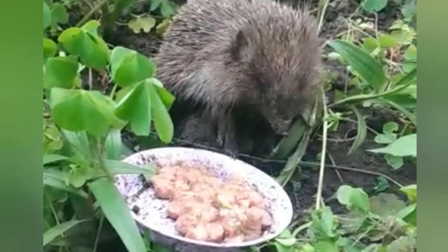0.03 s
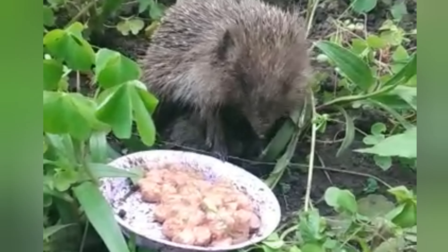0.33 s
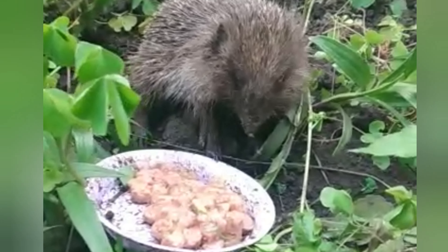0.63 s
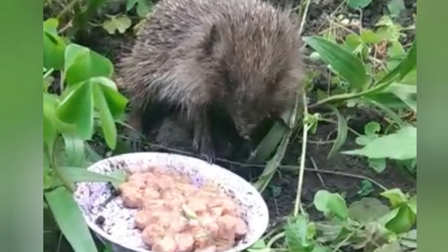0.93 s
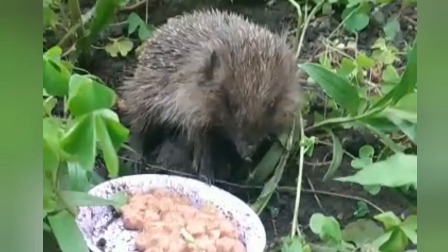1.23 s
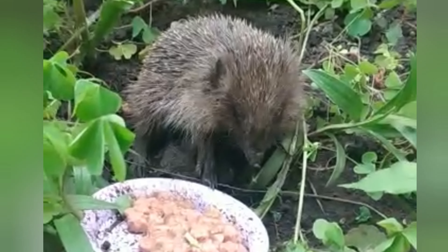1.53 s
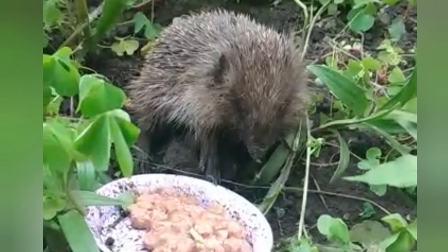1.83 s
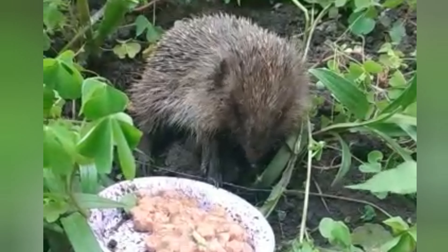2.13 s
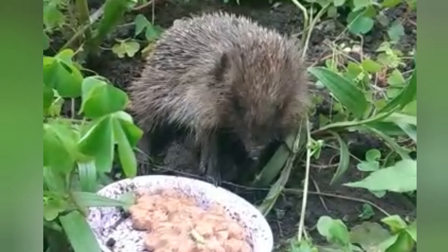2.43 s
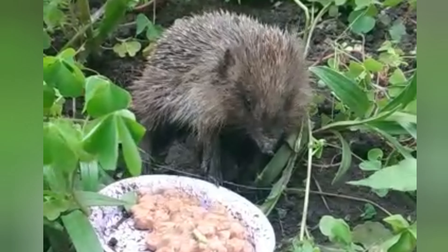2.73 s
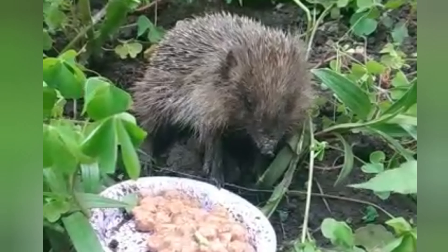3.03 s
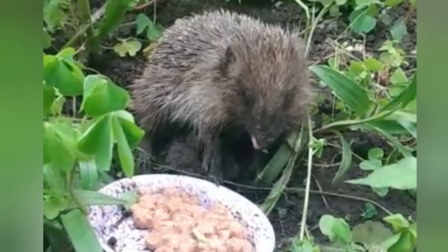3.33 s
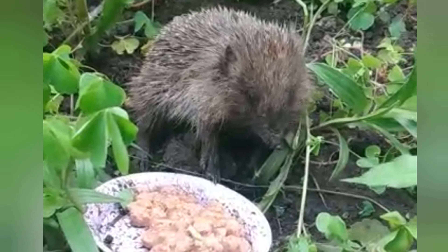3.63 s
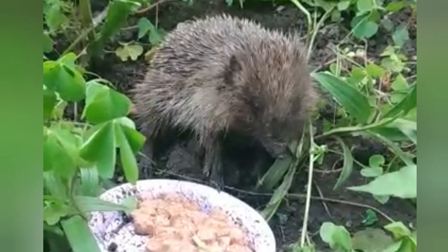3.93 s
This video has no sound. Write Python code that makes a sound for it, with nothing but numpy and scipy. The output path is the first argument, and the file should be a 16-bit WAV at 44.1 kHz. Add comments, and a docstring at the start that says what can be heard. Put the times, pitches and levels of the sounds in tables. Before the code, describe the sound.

A low, dull outdoor hum continues throughout, with light wind rumble on the microphone. From 0.25 to 0.55 seconds, handling knocks bump on the left, with one sharp click at 0.4. Soft wind puffs come on the right between 1.3 and 2.3 seconds. Leaves rustle faintly near 1.8 and 3.2 seconds, with a tiny dry crackle at 2.7 and a faint stem tick at 3.6.

```python
"""A quiet garden, where a hedgehog stands among plants by a dish of food.
A dull distant hum lies under light air rumbling on the two microphone ports.
Leaves stir faintly in swells of noise, stems tick and something dry crackles.
The hand-held recorder is knocked a few times near its left port: damped casing modes thud, ring, click."""
import sys
import numpy as np
from scipy import signal
from scipy.io import wavfile

SR = 44100
rng = np.random.default_rng(int(sys.argv[2]) if len(sys.argv) > 2 else 0)


def log_audio(samples):
    """Write samples as a 16-bit WAV file to the path given in sys.argv[1]."""
    # one column per channel
    frames = np.atleast_2d(samples).T
    # limit to full scale, then quantise
    limited = np.clip(frames, -1, 1)
    pcm = np.round(limited * 32767).astype(np.int16)
    wavfile.write(sys.argv[1], SR, pcm)


N = 176400

# Distant hum. Each row: frequency in Hz, relative spectral density in dB.
HUM_SPECTRUM = [(30,17.5),(50,14.5),(72,14),(95,6.5),(160,8.5),(250,-0.5),(390,0),(520,-6),(700,-5.5),(880,-6),(1200,-10),(1800,-13.5),(2300,-22.5),(2800,-31)]
# Each row: frequency in Hz, left-right correlation.
HUM_CORRELATION = [(60,1),(180,1),(300,.82),(520,.5),(890,.24),(1520,-0.2),(2600,-0.012)]
# Each row: frequency in Hz, left minus right in dB.
HUM_BALANCE = [(60,-1.5),(210,4),(490,4),(740,1),(1700,2.5),(2600,6)]
# Narrow bands in the hum. Each row: centre in Hz, width in Hz, level in dB.
DRONES = [(72.4,17,-58),(129,52,-62.5),(312.3,117,-65.5),(827,270,-80)]
# Air on each port. Each row: time in seconds, level in dB.
AIR_LEFT = [(0,-51.5),(1.2,-55.5),(1.55,-65.5),(2.0,-55),(2.5,-56.5),(3.3,-59.5),(4,-48)]
AIR_RIGHT = [(0,-42.5),(.33,-62.5),(.6,-58.5),(1.2,-58),(1.3,-48),(1.48,-49.5),(1.57,-44.5),(1.65,-39.5),(1.71,-54),(1.76,-47),(1.81,-40.5),(1.9,-42),(1.97,-36),(2.04,-46),(2.22,-46.5),(2.26,-32),(2.32,-47),(2.552,-54),(2.78,-47.5),(2.95,-59.5),(3.28,-59),(3.42,-45.5),(3.6,-75),(3.86,-39.5),(4,-66)]
# Gusts. Each row: peak time and length in seconds, centre and width in Hz, left and right level in dB.
GUSTS = [(1.3,0.024,73.6,69.5,-52,-43.5),(1.888,0.2,79,49.8,-55,-42.5),(2.261,0.018,110,130,-59,-40.5)]
# Leaf contacts. Each row: peak time in seconds, length in seconds, level in dB.
LEAF_BRUSHES = [(1.05,.16,-97),(1.578,.07,-97),(1.76,.14,-96),(2.2,.05,-96),(2.462,.06,-93),(3.9,.025,-90.5)]
# Leaf hiss. Each row: centre in Hz, width in Hz, gain in dB.
LEAF_BANDS = [(2730,870,-1),(6300,2000,-3.5)]
# Rasp, rustle, far whine. Each row: peak time and length in seconds, centre and width in Hz, level in dB.
RUSTLES = [(1.764,0.05,1420,446,-61),(1.782,0.097,1907,170,-66.5),(1.77,0.13,2200,1200,-76),(2.61,0.32,2310,698,-75.5),(2.727,0.024,1910,1000,-75),(3.141,0.066,1533,160,-63),(3.158,0.066,780,970,-60),(3.194,.08,2260,600,-79),(3.298,0.73,869,24.9,-67.5),(3.901,0.012,2520,700,-77)]
# Stem clicks. Each row: start in seconds, peak before panning in dB, centre in Hz, width in Hz.
STEM_TICKS = [(0.2717,-59,2400,556),(3.080,-77,10400,2800),(3.217,-81,11400,1600),(3.634,-60,1910,900)]
# Dry snaps. Each row: start in seconds, level in dB, T60 in seconds, pitch factor of the bright bands.
CRACKLES = [(.434,-73.5,0.016,0.54),(2.7147,-69,0.0092,0.89),(2.72,-66,0.049,1.01),(2.727,-67.5,0.016,0.84)]
# Bright resonances of a snap. Each row: centre in Hz, width in Hz, gain in dB.
CRACKLE_BANDS = [(7560,1600,-1.5),(11400,3800,-5)]
# Casing knocks. Each row: start in seconds, push, thud, ring and click gain in dB, contact low-pass in Hz.
KNOCKS = [(0.2524,-10,-19,-23,-46,1610),(0.2739,-7,-12.5,-42,-46,1190),(0.3442,-7.5,-25,-32,-51,1000),(0.352,-7,-13,-34,-30,1100),(0.412,-35,-18.5,-33.5,-41.5,3020),(0.4206,-33,-1.5,-0.5,-3.5,8240),(0.4357,-8,-13,-34,-50,2980),(0.5081,3.5,-29.5,-41,-30,2000),(.519,-8,-10.5,-32,-45,650),(.531,-11,-20.5,-33,-43,800)]
# Damped modes of a knock. Each row: frequency in Hz, gain in dB, T60 in seconds.
THUD_MODES = [(65,-26.5,0.089),(140,-24,0.041),(221,-24.5,0.031)]
RING_MODES = [(494,-15.5,0.018),(896,-29,0.0077)]
CLICK_MODES = [(1360,0.61,0.0024),(2000,-0.44,0.0031)]
PUSH_MODES = [(370,-24,0.012)]

HUM_DB, HUM_WANDER_DB, HUM_TOP_HZ, HISS_DB = -52, 0.88, 2755, -91.5
AIR_LOW_HZ, AIR_KNEE_HZ, AIR_TOP_HZ, AIR_FLUTTER_DB = 12, 58.6, 179, 0.5
STEM_LEFT_OVER_RIGHT_DB = 14.5
CRACKLE_BODY_HZ, CRACKLE_BODY_DB, CRACKLE_WIDTH_RATIO = 1680, -8 + 16, 0.44
CASING_TOP_HZ, RING_LAG_S = 2310, 0.00244
PING_HZ, PING_GAIN_DB, PING_T60_S, PING_TOP_HZ = 6100, -26, 0.0011, 7640
THUD_RIGHT_DB, SHARP_RIGHT_DB = -13.5, -35
CUTOFF_HZ = 15700

TIME_S = np.arange(N) / SR
SIDES = np.array([[1], [-1]])  # left, right


def from_db(db):
    """Decibels to gain."""
    return 10 ** (np.asarray(db) / 20)


def unit_rms(x):
    """Scale to unit power."""
    return x / np.sqrt(np.mean(x ** 2) + 1e-20)


def at_hz(points, hz):
    """Interpolate on a log-frequency axis."""
    freqs_hz, values = np.transpose(points)
    return np.interp(np.log(hz), np.log(freqs_hz), values)


def filtered(x, hz, kind, order=2):
    """Butterworth filter."""
    sos = signal.butter(order, np.clip(hz, 5, .47 * SR), kind, fs=SR, output="sos")
    return signal.sosfilt(sos, x + 1e-18)


def bandpass(x, hz, width_hz, order=2):
    """Band with geometric centre hz."""
    mid_hz = np.hypot(hz, width_hz / 2)
    return filtered(x, [mid_hz - width_hz / 2, mid_hz + width_hz / 2], "band", order)


def noise_band(hz, width_hz):
    """Stereo band noise, rms 1."""
    white = rng.standard_normal((2, N + SR // 4))
    return unit_rms(bandpass(white, hz, width_hz)[:, -N:])


def drift(rate_hz):
    """Slow random wander, rms about 1."""
    hop = 40
    pole = np.exp(-2 * np.pi * rate_hz * hop / SR)
    white = rng.standard_normal(N // hop + 2002)
    slow = signal.lfilter([1], [1, -2 * pole, pole * pole], white)[2000:]
    return np.interp(np.arange(N) / hop, np.arange(len(slow)), unit_rms(slow))


def swell(peak_s, length_s, db):
    """Gaussian envelope, length_s wide at 1/e."""
    return from_db(db) * np.exp(-(2 * (TIME_S - peak_s) / length_s) ** 2)


def struck(gain_db, modes, top_hz, order=4):
    """One blow rings damped modes, neighbours in opposite sign; low-passed at top_hz."""
    t = np.arange(SR // 2) / SR
    ringing = sum((-1) ** k * from_db(gain_db + db - 60 * t / t60_s) * np.sin(2 * np.pi * hz * t)
                  for k, (hz, db, t60_s) in enumerate(modes))
    return filtered(ringing, top_hz, "low", order)


def distant_hum():
    """Dull far noise in third octaves, correlated in the bass, with drones and a trace of hiss."""
    edges_hz = 22 * 2 ** (np.arange(23) / 3)
    white = rng.standard_normal((2, 2, N))
    bands = 0
    for k, (low_hz, high_hz) in enumerate(zip(edges_hz, edges_hz[1:])):
        mid, side = filtered(white[k % 2], [low_hz, high_hz], "band")
        hz = np.sqrt(low_hz * high_hz)
        correlation = np.clip(at_hz(HUM_CORRELATION, hz), -1, 1)
        stereo = np.sqrt(1 + correlation) * mid + np.sqrt(1 - correlation) * side * SIDES
        band_db = at_hz(HUM_SPECTRUM, hz) + HUM_WANDER_DB * drift(rate_hz=9.8)
        bands += from_db(band_db + SIDES * at_hz(HUM_BALANCE, hz) / 2) * stereo
    drones = sum(from_db(db) * noise_band(hz, width_hz)[0] for hz, width_hz, db in DRONES)
    hum = filtered(from_db(HUM_DB) * unit_rms(bands) + drones, HUM_TOP_HZ, "low", order=14)
    return hum + from_db(HISS_DB) * rng.standard_normal((2, N))


def port_air():
    """Light air rumbles on each port separately."""
    rumble = filtered(rng.standard_normal((2, N + SR)), AIR_KNEE_HZ, "low")
    rumble = filtered(rumble, AIR_LOW_HZ, "high")
    rumble = filtered(rumble, AIR_TOP_HZ, "low")[:, SR:]
    flutter = from_db(AIR_FLUTTER_DB * drift(rate_hz=11))
    level_db = [np.interp(TIME_S, *np.transpose(port)) for port in (AIR_LEFT, AIR_RIGHT)]
    return unit_rms(rumble * flutter) * from_db(level_db)


def gusts():
    """Gusts swell into a low flutter, mostly on the right port."""
    return sum(swell(peak_s, length_s, [[left_db], [right_db]]) * noise_band(hz, width_hz)
               for peak_s, length_s, hz, width_hz, left_db, right_db in GUSTS)


def rustles():
    """Soft swells of noise, some narrow enough to have a pitch."""
    swells = sum(swell(peak_s, length_s, db) * noise_band(hz, width_hz)
                 for peak_s, length_s, hz, width_hz, db in RUSTLES)
    return filtered(swells, HUM_TOP_HZ, "low", order=10)


def leaves():
    """Leaves brush each other: a thin hiss that comes and goes."""
    envelope = sum(swell(*brush) for brush in LEAF_BRUSHES)
    return envelope * sum(from_db(db) * noise_band(hz, width_hz) for hz, width_hz, db in LEAF_BANDS)


def stem_ticks():
    """Stems tick off to the left: each impulse rings briefly in its own band."""
    out = np.zeros(N)
    for start_s, db, hz, width_hz in STEM_TICKS:
        ring = bandpass(signal.unit_impulse(N, int(start_s * SR)), hz, width_hz, order=4)
        out += from_db(db) * ring / np.abs(ring).max()
    return out * from_db(SIDES * STEM_LEFT_OVER_RIGHT_DB / 2)


def crackles():
    """Tiny dry snaps: fast-dying noise in two bright resonances and a lower body."""
    body = from_db(CRACKLE_BODY_DB) * noise_band(CRACKLE_BODY_HZ, CRACKLE_WIDTH_RATIO * CRACKLE_BODY_HZ)
    out = 0
    for start_s, db, t60_s, pitch in CRACKLES:
        age_s = np.maximum(TIME_S - start_s, 0)
        envelope = (TIME_S >= start_s) * from_db(db - 60 * age_s / t60_s)
        bright = sum(from_db(gain_db) * noise_band(pitch * hz, width_hz)
                     for hz, width_hz, gain_db in CRACKLE_BANDS)
        out += envelope * (bright + body)
    return out


def casing_knocks():
    """Knocks by the left port: hard ones click, ring hollow and thud; soft ones mainly push air."""
    out = 0
    for start_s, push_db, thud_db, ring_db, click_db, contact_hz in KNOCKS:
        thud = -struck(thud_db, THUD_MODES, CASING_TOP_HZ / 2, order=2)
        ring = -struck(ring_db, RING_MODES, CASING_TOP_HZ)
        late_ring = np.pad(ring, (int(RING_LAG_S * SR), 0))[:len(ring)]
        click = struck(click_db, CLICK_MODES, CASING_TOP_HZ, order=5)
        ping = struck(click_db, [(PING_HZ, PING_GAIN_DB, PING_T60_S)], PING_TOP_HZ)
        push = struck(push_db, PUSH_MODES, CASING_TOP_HZ)
        sharp = late_ring + click + ping + push
        left = thud + sharp
        right = from_db(THUD_RIGHT_DB) * thud + from_db(SHARP_RIGHT_DB) * sharp
        knock = filtered(np.array([left, right]), contact_hz, "low", order=4)  # softer contact is duller
        out += np.pad(knock, ((0, 0), (int(start_s * SR), N)))[:, :N]
    return out


def scene():
    """The garden at the two ports."""
    background = distant_hum() + port_air() + gusts()
    return background + rustles() + leaves() + stem_ticks() + crackles() + casing_knocks()


def record(dry):
    """Steep elliptic low-pass."""
    return signal.sosfilt(signal.ellip(10, .1, 70, CUTOFF_HZ, fs=SR, output="sos"), dry)


dry = scene()
out = record(dry)
log_audio(out)
```